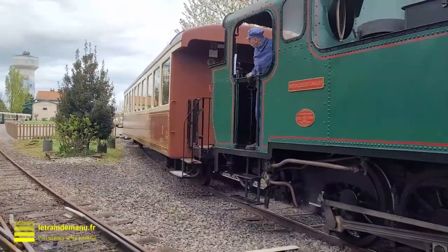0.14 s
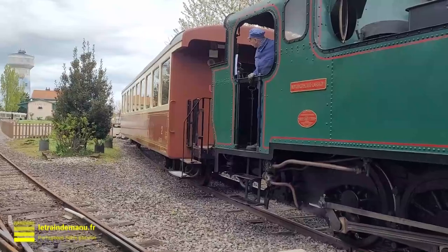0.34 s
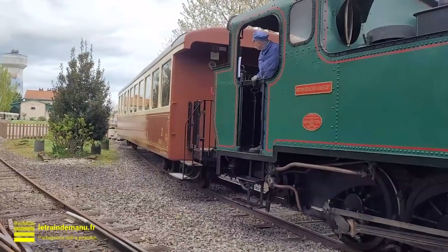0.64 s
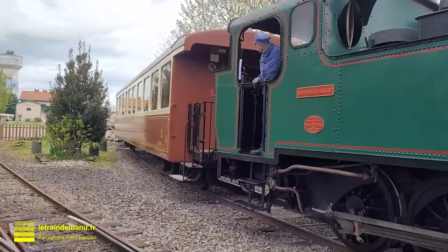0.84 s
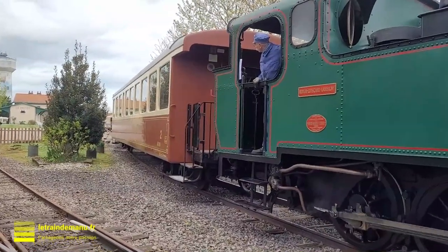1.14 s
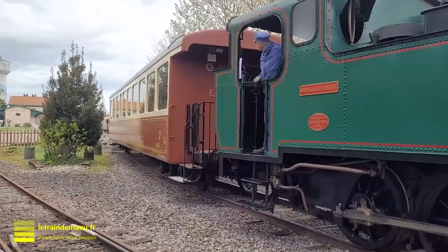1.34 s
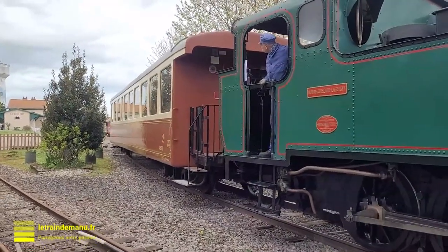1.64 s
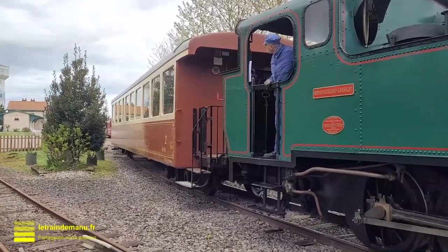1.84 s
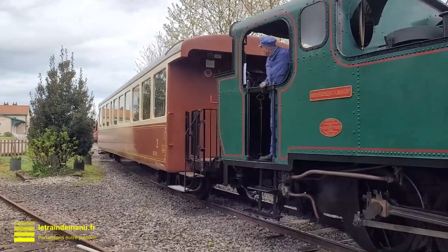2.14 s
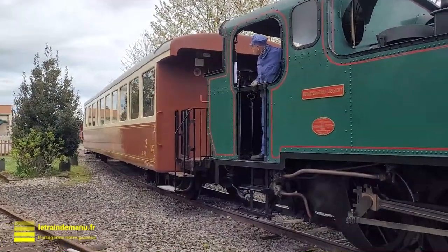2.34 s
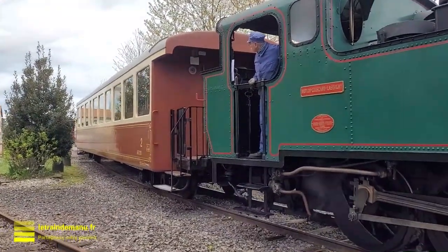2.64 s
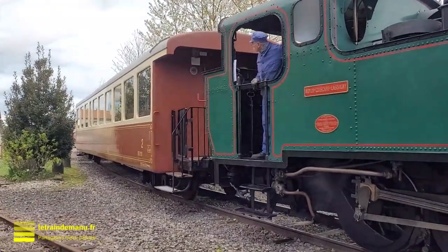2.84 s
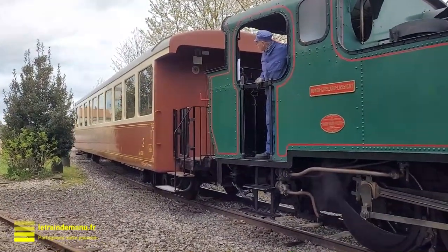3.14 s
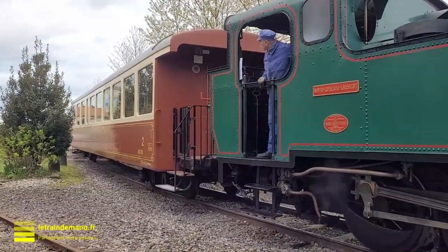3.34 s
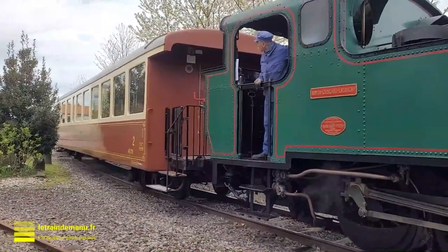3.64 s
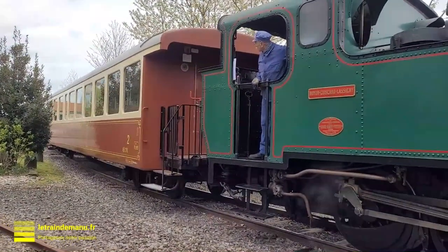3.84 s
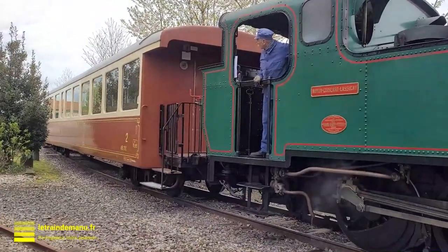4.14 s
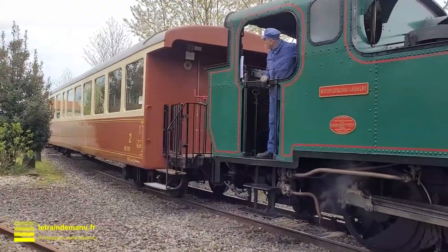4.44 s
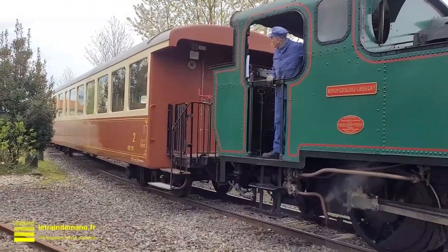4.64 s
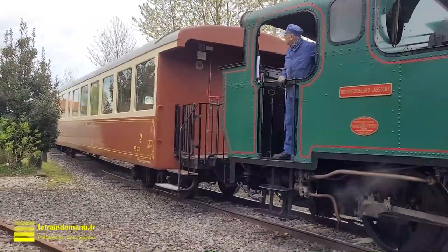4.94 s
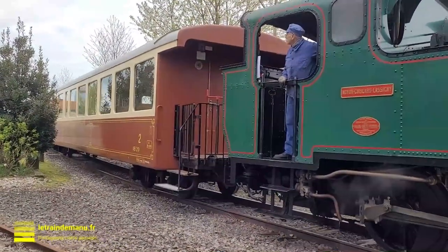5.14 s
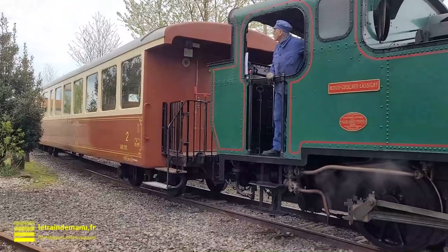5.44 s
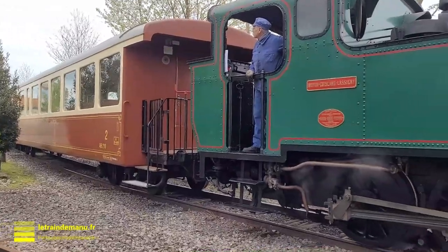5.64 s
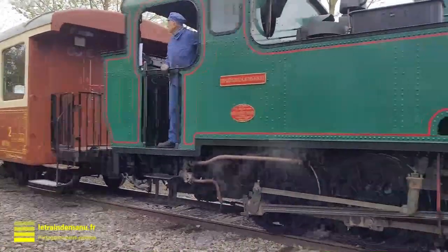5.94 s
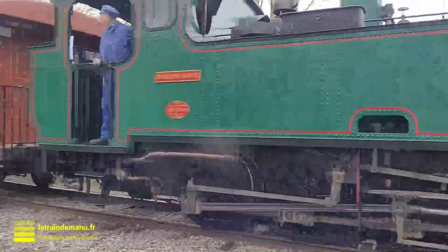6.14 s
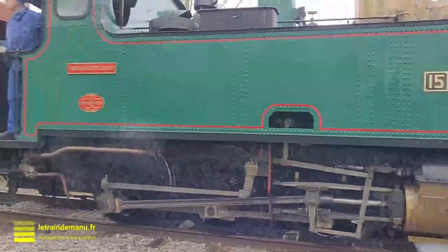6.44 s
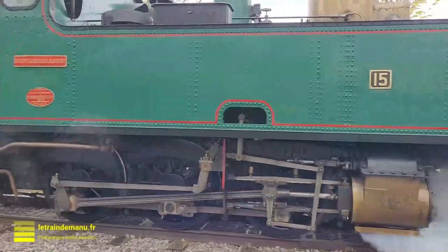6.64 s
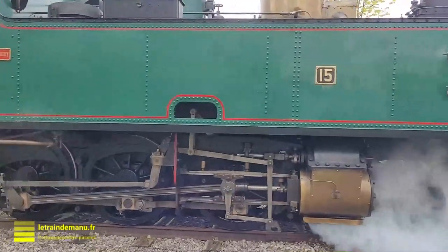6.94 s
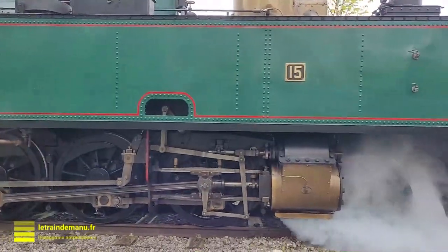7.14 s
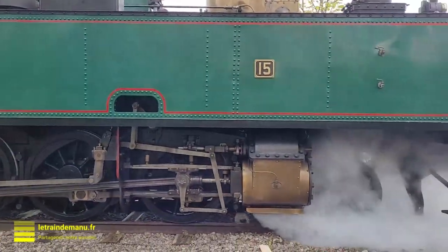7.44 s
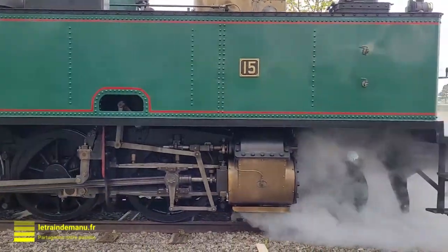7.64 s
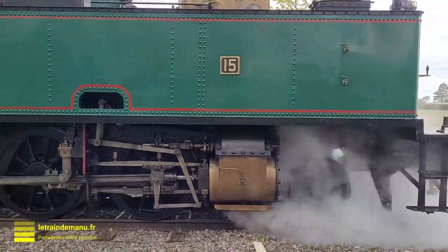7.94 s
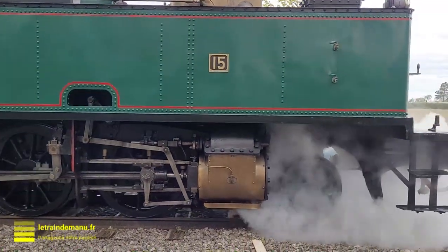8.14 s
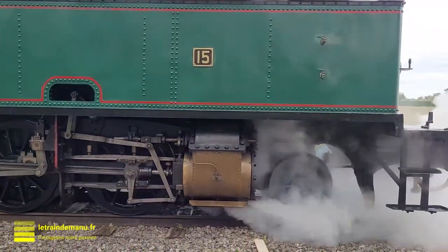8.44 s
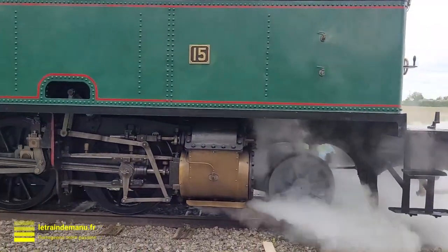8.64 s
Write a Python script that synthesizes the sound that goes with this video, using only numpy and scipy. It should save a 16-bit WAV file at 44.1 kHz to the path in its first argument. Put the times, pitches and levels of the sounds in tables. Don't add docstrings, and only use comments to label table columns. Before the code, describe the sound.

A small steam engine creeps past, brake rod groaning and knocking early on, while rushing drain-cock steam swells, weakens and surges again above deep rumbling.

```python
import sys
import numpy as np
from scipy import signal
from scipy.io import wavfile
from scipy.ndimage import uniform_filter1d

SR = 44100
rng = np.random.default_rng(int(sys.argv[2]) if len(sys.argv) > 2 else 0)


def persist_wave(psi):
    counts = np.round(np.clip(psi, -1, 1) * 32767).astype(np.int16)
    wavfile.write(sys.argv[1], SR, np.atleast_2d(counts).T)


def makeup_ratio(level_db):
    decades = np.asarray(level_db, float) / 20
    return 10 ** decades


N = 387632
LAG_ASIDE = 18.77


def evened(x):
    return x / np.sqrt(np.mean(x ** 2) + 1e-20)


def by_hz(table, hz):
    table_hz, *columns = np.transpose(table)
    return [np.interp(np.log(hz + 1), np.log(table_hz + 1), c)[:, None] for c in columns]


def by_time(table, t):
    s, *columns = np.transpose(table)
    return [np.interp(t, s, c) for c in columns]


def bell(hz, centre_hz, width_hz):
    return np.exp(-.5 * ((hz[:, None] - centre_hz) / width_hz) ** 2)


def bumps(t, at, length, db):
    return (db * np.exp(-.5 * ((t[:, None] - at) / length) ** 2)).sum(1)


def between(t, start, end, ramp_s=0.26):
    return np.clip(np.minimum(t - start, end - t) / ramp_s + .5, 0, 1)


def resonate(x, hz, width):
    turn = np.exp(2j * np.pi * np.cumsum(hz * np.ones(len(x))) / SR)
    r = np.exp(-np.pi * width / SR)
    return 2 * (turn * signal.lfilter([1 - r], [1, -r], x / turn + 1e-18)).real


def times_and_pitches(size):
    return np.arange(4 * N // size + 5) * size / 4 / SR, np.fft.rfftfreq(size, 1 / SR)


# time_s, aim (0 jet aside .. 1 jet ahead)
AIM = [
    (0, 0.066),
    (4.9, 0),
    (5.7, 0.16),
    (6.0, 0.28),
    (6.3, 0.84),
    (6.9, 0.92),
    (8.79, 0.71),
]
# pitch_hz, likeness_aside, likeness_ahead (0..1)
LIKENESS = [(25, 0.65, .6), (70, 0.81, 0.95), (342, 0.66, 0.76), (600, 0.52, 0.75), (1150, 0.79, 0.51),
            (2170, 0.84, 0.25), (2700, 0.44, 0.37), (3900, 0.4, 0.25), (4700, 0.34, 0.41),
            (5200, 0.32, 0.38), (6000, 0.36, .12), (6500, 0.24, 0.14), (7300, .38, .22), (8300, 0.15, 0.15),
            (10800, 0.18, .2), (12400, .08, .12), (14000, .28, .12), (15500, .15, .1)]
# pitch_hz, aside_radians, ahead_radians (left is late)
PHASE_TURN = [(430, -.3, 0), (1300, -.1, 0), (1750, .4, .4), (2150, .3, -.3), (2600, .2, -1),
              (3000, -1, -4), (3900, -2.9, -3.4), (4750, -4.4, -4.4), (5170, -5.7, -5.5), (5600, -6.4, -6),
              (6500, -5.2, -9.6), (7300, -5.2, -9.6), (9500, -4.8, -14.8), (11000, -4.5, -14.6),
              (13500, -5.1, -14), (15000, -4.3, -14.8)]


def noise_pair(t, hz, left_db, right_db, patchy_db, patch_s, patch_hz, flicker_db, flicker_s):
    a, b, c, d, patches = rng.standard_normal((len(t), len(hz), 5)).T
    patches = uniform_filter1d(patches, max(int(patch_hz / hz[1]), 1), 0)
    patches = evened(uniform_filter1d(patches, max(int(patch_s / t[1]), 1), 1))
    flicker = evened(uniform_filter1d(rng.standard_normal(len(t)), max(int(flicker_s / t[1]), 1)))
    aim = by_time(AIM, t)[0]
    aside, ahead = by_hz(LIKENESS, hz)
    same = np.clip(aside + (ahead - aside) * aim, 0, 1)
    turn_aside, turn_ahead = by_hz(PHASE_TURN, hz)
    turn_aside = turn_aside + 2 * np.pi * hz[:, None] * LAG_ASIDE / SR
    facing = np.clip((aim - .1) / .65, 0, 1)
    late = np.exp(-1j * (turn_aside + (turn_ahead - turn_aside) * facing))
    right = a + 1j * b
    left = same * late * right + np.sqrt(1 - same ** 2) * (c + 1j * d)
    swing = makeup_ratio(patchy_db * patches + flicker_db * flicker)
    z = np.array([left * makeup_ratio(left_db), right * makeup_ratio(right_db)]) * swing
    size = 2 * len(hz) - 2
    return signal.istft(z, nperseg=size, noverlap=3 * size // 4)[1][:, :N] / np.sqrt(size)


# start_s, dip_hz, dip_spacing_hz, left_strength, right_strength (0..1)
ECHOES = [
    (0, 1230, 400, .1, 0.18),
    (1.0, 880, 345, 1, 0.057),
    (4.98, 1155, 635, 0.26, 0.38),
    (6.12, 1650, 400, 0.23, 0.83),
    (7.3, 1598, 740, 0.089, 0.69),
]
# (pitch_hz, width_hz, left_db, right_db)
SCREENS = [
    (0, 1.3, [(3560, 430, -4, 1), (4800, 310, 0, -3), (950, 250, 4, 0)]),
    (1.5, 6.22, [(2503, 43, -3, -17), (6600, 450, 8, 1.5), (3370, 56, 4, -9), (13100, 340, -5, 1)]),
    (4.5, 6.13, [(2820, 110, 0, -3), (910, 290, 8.5, 5.5), (2490, 44, -5, 12), (1890, 210, 0.5, -6.5), (2060, 270, 2, 7.5)]),
    (4.5, 7.1, [(5240, 280, 0, 1.5)]),
    (6, 7.22, [(2030, 100, 1, 3), (15000, 770, -0.5, 4), (7000, 460, 2, 0.5)]),
    (6.5, 10, [(828, 52, -21, -2), (2000, 170, 3.5, 2.5), (15400, 400, 5, -9), (8700, 810, -0.5, -1), (13300, 480, -7, -1.5)]),
    (8.42, 9, [(3600, 200, -1.5, -2), (2020, 1100, 2.5, 2), (1740, 100, 0, -5), (2700, 170, -1, -7), (9000, 400, 0, 1)]),
]
# (pitch_hz, width_hz, left_db, right_db)
RIDGES_ASIDE = [
    (1.443, 2.003, [(1910, 76, 3, -1.5), (3020, 470, -1.5, -2), (6000, 490, -5, -1.5), (8000, 200, -7, -1)]),
    (2.4, 3.35, [(2170, 54, -1, -2), (4850, 120, 4, -2), (1560, 140, -0.5, -2)]),
    (3.35, 4.2, [(1550, 190, -1, -2), (2320, 77, 2, 2.5), (5100, 310, 0, 1), (5900, 270, 0.5, -2)]),
    (4.15, 4.6, [(1460, 71, 0.5, 2.5), (1600, 41, 1, -4), (1150, 100, 0, 0.5), (2900, 200, -1, -2.5), (4870, 250, 3, 1)]),
    (4.62, 4.97, [(1030, 250, -10, -5), (2120, 250, -2, -3), (1560, 80, -8, -3)]),
    (1.05, 1.45, [(1700, 300, 2, 2), (2150, 130, 1, 1)]),
    (2.1, 3.35, [(5200, 200, -2, 2.5), (1070, 200, -3.5, -2)]),
    (5.05, 5.702, [(1560, 120, 0, -3), (2120, 69, 2, -1), (4720, 96, 2, 4), (4980, 90, -8, -4), (3200, 190, -1.5, -1.5), (2450, 110, -4, -4), (1270, 64, -2, 1)]),
]
# (pitch_hz, width_hz, left_db, right_db)
RIDGES_AHEAD = [
    (5.7, 6.3, [(1488, 78, -1, 2), (4770, 71, -8, 4), (5260, 114, 0, 6), (9900, 230, 3, 2), (6900, 370, -2.5, -1)]),
    (6.3, 7.4, [(4700, 150, -1, 2), (3100, 170, -1.5, 0.5), (8930, 250, 0, 4.5), (7300, 300, 0, 0.5), (1590, 54, -3, -9)]),
    (7.403, 8.35, [(1430, 35, 3, 5.5), (1640, 90, 1, -4), (2000, 120, -2, -1), (4550, 160, 0, 0.5), (5030, 180, -3, -2)]),
    (8.4, 9, [(1150, 130, -1.5, -3), (2000, 120, -4, -0.5), (2600, 180, 0, 0), (3450, 120, 1.5, 0), (5830, 220, 0, -5), (7000, 540, 0.5, -1.5)]),
]
# start_s, end_s, start_hz, end_hz, level_db
SLIDES = [(5.6, 5.98, 2800, 2400, -7), (6.8, 6.2, 2100, 2660, 1), (6.28, 6.44, 3300, 3200, -14),
          (6.44, 6.6, 3230, 3000, -4), (6.2, 6.9, 2250, 2600, -10), (6, 6.82, 3300, 3040, -6),
          (7.05, 7.3, 2600, 2600, -3), (8.19, 8.6, 2400, 2800, -8), (6.7, 6.97, 3400, 2950, -18),
          (6.93, 6.97, 3060, 3060, -18), (6.6, 7.02, 2700, 2680, -14), (6.3, 7.2, 2200, 2400, -9),
          (7.5, 8.8, 3800, 2700, 5), (8.25, 9.8, 2900, 3200, -8)]


def surroundings(t, hz):
    out = np.zeros((2, len(hz), len(t)))
    ends = [row[0] for row in ECHOES[1:]] + [N]
    for (s, dip_hz, spacing_hz, *strength), end in zip(ECHOES, ends):
        comb = np.exp(-(hz / 2140) ** 2 + 2j * np.pi * (hz - dip_hz) / spacing_hz)
        echo = np.outer(strength, comb)
        out += 20 * np.log10(abs(1 - echo) + 0.033)[..., None] * between(t, s, end)
    for s, end, bands in SCREENS + RIDGES_ASIDE + RIDGES_AHEAD:
        colour_db = sum(np.multiply.outer(db, bell(hz, f, width)) for f, width, *db in bands)
        share = between(t, s, end)
        out[..., share > 0] += colour_db * share[share > 0]
    for s, end, start_hz, end_hz, db in SLIDES:
        path_hz = np.interp(t, [s, end], [start_hz, end_hz])
        out += db * bell(hz, path_hz, 59) * between(t, s, end, ramp_s=0.071)
    return out


# time_s, jet_db
STEAM = [(0.0, -25), (0.41, -33), (0.66, -40.5), (0.9, -57.5), (1.03, -42.5), (1.37, -29), (1.62, -24.5),
         (1.92, -21.5), (2.05, -21.5), (4.02, -24.5), (4.89, -32), (5.36, -22), (5.6, -25), (6.27, -24),
         (7.05, -24), (7.35, -24), (8.2, -28), (8.55, -21)]
# time_s, pipe_db, port_db, fizz_db
BREATHS = [(0, -6.5, -0.5, 3.5), (.5, -1.5, 4, 2.5), (1.35, -4, 3, 3), (1.8, -3, 1, 4), (2.1, 0.5, 0.5, 2),
           (2.6, 4, 1.5, 3.5), (3.5, 4, 3, 4.5), (4.05, 1.5, 3, 4.5), (4.45, 2.5, 1, 4),
           (4.68, -2.5, 3, 5.5), (4.9, -1.5, 3, 6), (5.4, -4, 1.5, 4), (5.8, -1.5, 3, 3),
           (6.15, -2.5, 4.5, 4), (6.45, 1.5, 1, 2.5), (7.3, 2, 1, 2), (7.6, 1, 3, 3), (8.5, 3, 3.5, 3)]
# time_s, length_s, jet_db, ring_db (of pipe and port)
SPITS = [(0.945, .03, -2.5, 0), (1.976, 0.02, -2, -1), (2.1, 0.078, 1.5, 0.5), (4.178, 0.068, -1.5, 0),
         (5.04, 0.022, 1.5, 0), (5.562, 0.014, -2.5, 0.5), (5.874, 0.029, 2, -0.5), (6.136, 0.026, 1, -3),
         (6.241, 0.032, 0, 1.5), (1.7, 0.12, -0.5, 1.5), (6.387, 0.031, -1.5, 2), (6.5, 0.03, 1, 1.5),
         (6.82, 0.024, -3, 0), (6.923, 0.022, 2, -3), (7.045, 0.034, 2, -3), (7.118, 0.019, -1, -1),
         (7.19, .03, -0.5, -0.5), (7.366, 0.069, -3.5, 0), (2.701, 0.037, -1, 1),
         (2.548, 0.045, -0.5, -0.5), (3.33, .04, 0, 0), (3.42, 0.027, 0, -1.5), (3.527, 0.033, -0.5, 0.5),
         (5.465, 0.04, 0.5, -0.5), (1.85, 0.064, -2.5, 0.5), (7.62, .06, -2.5, 0.5),
         (7.837, .05, -0.5, -.5), (8.45, 0.032, -1, -1.5), (8.5, .025, -0.5, 1.5), (6.97, 0.014, 1, -3),
         (5.52, .015, -0.5, -1), (8.79, 0.11, -1.5, -1)]
# pitch_hz, left_aside_db, right_aside_db, left_ahead_db, right_ahead_db
JET_COLOUR = [(664, -12.5, -7, -2.5, -3), (880, -17, -14, -6, -6.5), (1038, -8, -7.5, -5.5, -12),
              (1474, -2.5, -1, -5.5, -3.5), (2000, -1, 2.5, -9, -7), (2690, -7, 0, -6, -8),
              (3130, -7.5, -3, -3.5, -9), (3810, -3, -8.5, -3.5, -4), (4790, -9, -0.5, -3.5, 4),
              (5420, -6.5, -0.5, -5.5, -2.5), (6800, -13, -7, -6.5, -9), (9700, -14, -11.5, -12, -9),
              (12150, -13, -11, -4.5, -5.5), (15300, -10, -9.5, -8, -6)]
# pitch_hz, width_hz, level_db
PORT_DIPS = [
    (8290, 354, -14),
    (9190, 630, -9),
]


def jets():
    t, hz = times_and_pitches(size=1024)
    aim, jet_db = by_time(AIM, t)[0], by_time(STEAM, t)[0]
    pipe_db, port_db, fizz_db = by_time(BREATHS, t)
    at, length, spit_db, ring_db = np.transpose(SPITS)
    spit_db, ring_db = bumps(t, at, length, spit_db), bumps(t, at, length, ring_db)
    jet_db = jet_db + spit_db
    fizz_db = fizz_db + 0.33 * spit_db
    breath_db = jet_db + (pipe_db + ring_db) * bell(hz, 2270, 520)
    breath_db = breath_db + (port_db + ring_db) * bell(hz, 4860, 940)
    breath_db = breath_db + fizz_db * (hz[:, None] > 8400)
    breath_db = breath_db - 60 * np.clip(1 - hz[:, None] / 800, 0, 1) + 13.5
    dips_db = [db * bell(hz, f, width) for f, width, db in PORT_DIPS]
    left_db, right_db = breath_db + surroundings(t, hz) + dips_db
    left_aside, right_aside, left_ahead, right_ahead = by_hz(JET_COLOUR, hz)
    left_db = left_db + left_aside + (left_ahead - left_aside) * aim
    right_db = right_db + right_aside + (right_ahead - right_aside) * aim
    return noise_pair(t, hz, left_db, right_db, patchy_db=1.09, patch_s=0.08, patch_hz=250,
                      flicker_db=0.35, flicker_s=.03)


# time_s, level_db
LOAD = [
    (0, -41),
    (.6, -50),
    (1.1, -46),
    (1.7, -39.5),
    (2.1, -46),
    (2.8, -54),
    (3.7, -54),
    (4.9, -49),
    (5.5, -45),
    (8.79, -49),
]
# time_s, length_s, level_db (over the load)
JOLTS = [(0.05, 0.044, -9), (1.03, .02, 4), (3.13, 0.21, 11), (3.51, 0.026, 8.5), (4.247, 0.029, 7.5),
         (4.59, 0.029, 7.5), (6.287, 0.018, -3), (8.13, 0.037, -4), (5.056, 0.049, 5), (5.432, 0.043, 1.5),
         (6.05, 0.11, 3.5), (6.355, 0.077, -2.5), (6.804, .05, 1), (6.93, .03, 4.5), (7.048, 0.019, 2),
         (7.222, 0.015, 5), (7.451, 0.11, 3), (8.257, 0.029, 6), (8.444, 0.073, 4)]
# pitch_hz, aside_db, ahead_db
LOW_COLOUR = [(20, -10, -21), (35, -14, -9), (60.6, 4, -0.5), (112, -2, 0), (131, -2, 0.5),
              (193, -7.5, -4.5), (238, -3.5, -1), (319, -11, -7.5), (400, -6.5, -22.5), (450, -9, -10),
              (547, -17, -8.5), (633, -7.5, -4.5), (820, -9, -15.5), (920, -3, -51)]
# start_s, end_s, pitch_hz, width_hz, level_db
HOLLOWS = [(-1, 1.46, 570, 76, 3.5), (-2, 1, 1080, 130, 8), (4, 1.2, 520, 64, 5), (1.5, 1.6, 500, 35, -7),
           (3, 4.2, 525, 43, -7), (-0.2, 1.67, 294, 53, 5.5), (2.5, 2.92, 216, 47, -8.5),
           (4, 6, 550, 38, 5), (8, 8.9, 430, 79, -5), (1.5, 3.4, 310, 46, -5), (6.5, 6, 410, 46, -3.5),
           (6, 2.9, 250, 40, -3)]
# pitch_hz, level_db (per Hz)
YARD_WASH = [(410, -30), (700, -11), (1380, 2), (2110, -11), (2530, -14), (3550, -8), (4200, -6),
             (5170, -24), (8700, -42), (12000, -28), (15600, -24)]


def rumble():
    t, hz = times_and_pitches(size=2048)
    hz_part = hz[:, None]
    aim, load_db, jet_db = by_time(AIM, t)[0], by_time(LOAD, t)[0], by_time(STEAM, t)[0]
    wander, wander_s = 0.038, 0.13
    drift = evened(uniform_filter1d(rng.standard_normal(len(t)), max(int(wander_s / t[1]), 1)))
    aside, ahead = (column[:, 0] for column in by_hz(LOW_COLOUR, hz_part * (1 + wander * drift)))
    jolt_db = bumps(t, *np.transpose(JOLTS))
    extra_load_db, extra_jet_db = load_db - load_db.mean(), jet_db - jet_db.mean()
    body_db = -44.5 + 0.62 * extra_load_db + 0.76 * jolt_db - 0.5 * aim
    roar_db = -46 + 0.42 * extra_jet_db + 0.29 * extra_load_db + 1.5 * aim
    upper_db = np.where(hz_part < 400, body_db, roar_db)
    level_db = np.where(hz_part < 95, load_db + jolt_db, upper_db) + 30.5
    db = level_db + aside + (ahead - aside) * aim - 0.039 * np.maximum(hz_part - 850, 0)
    db = db + sum(dip_db * bell(hz, f, width) * between(t, s, end) for s, end, f, width, dip_db in HOLLOWS)
    db = np.maximum(db, by_hz(YARD_WASH, hz)[0] - 54.5 + 21.5)
    return noise_pair(t, hz, db - 2.0, db, patchy_db=2, patch_s=.1, patch_hz=80,
                      flicker_db=1.27, flicker_s=.06)


# start_s, length_s, level_db
GROANS = [(0.036, .07, -42), (0.328, 0.065, -33.5), (0.637, 0.22, -35), (0.803, 0.33, -27),
          (1.124, 0.16, -31.5), (1.241, 0.054, -35), (1.31, 0.21, -28), (1.493, 0.42, -28.5),
          (1.905, 0.17, -37), (2.067, 0.11, -40), (4.454, 0.041, -55), (4.56, 0.14, -35.5),
          (4.718, .1, -39.5), (5.007, 0.18, -37), (5.214, 0.088, -36), (5.802, 0.13, -38),
          (5.937, 0.066, -29.5), (6.047, 0.1, -35.5), (6.203, 0.081, -38), (8.05, 0.12, -37.5),
          (8.206, 0.076, -34.5), (8.345, .12, -43), (8.583, 0.11, -39)]


def groan():
    tugs = (rng.random(N) < 110 / SR) * rng.uniform(0.62, 1, N)
    level, hz = np.zeros(N), np.full(N, 126.6)
    for s, length, db in GROANS:
        u, first = np.linspace(0, 1, round(length * SR)), round(s * SR)
        level[first:][:len(u)] += makeup_ratio(db - 8.5 * u) * signal.windows.tukey(len(u), 0.26)
        hz[first:][:len(u)] -= 2.5 * u
    tone = resonate(resonate(tugs, hz, 9.4), hz, 52)
    return level * tone / np.sqrt(uniform_filter1d(tone ** 2, 2000) + 1e-14)


def ring(modes, detune, onset_s):
    t = np.arange(SR // 8) / SR
    tones = 0
    for (hz, db, t60), d in zip(modes, detune):
        tones = tones + makeup_ratio(db - 60 * t / t60) * np.sin(2 * np.pi * hz * d * t)
    return tones * (1 - np.exp(-t / onset_s))


# time_s, peak_db, hollow_db
SLIPS = [(0.052, -23.5, -14), (0.151, -27, -7), (0.26, -29.5, -5), (0.352, -28, -11), (0.416, -26, -11),
         (0.509, -30, -8), (0.573, -34, -16), (0.65, -26, -6), (0.672, -27, -6), (0.727, -28, -11),
         (0.748, -22.5, -5), (0.786, -21.5, -9), (0.807, -24, -3.5), (0.838, -23, -10), (0.853, -30, -3),
         (0.868, -25, -12), (0.888, -24, -10), (0.903, -26, -14), (.935, -36, -3), (0.963, -35, -7),
         (.98, -39, -2), (1.001, -26, -12), (1.013, -26, -14), (1.04, -26, -9), (1.057, -30, -5),
         (1.112, -25.5, -17), (1.191, -26, -20), (1.234, -25.5, -11), (1.262, -27, -8), (1.337, -27, -17),
         (1.437, -32, -15), (1.554, -30, -9), (1.653, -30, -17), (1.701, -38.5, 7), (1.772, -34, -4),
         (8.582, -27.5, -20)]
# pitch_hz, level_db, t60_s
ROD = [
    (248, 0, 0.14),
    (295, -1, 0.12),
    (180, 4, 0.027),
]
# pitch_hz, level_db, t60_s
ROD_HOLLOW = [
    (513, 1.5, 0.063),
    (613, 5, 0.037),
    (826, 2.5, 0.017),
]


def slips():
    out = np.zeros(N + SR)
    detune = 1 + 0.046 * rng.standard_normal((len(SLIPS), 2, 3))
    for (s, db, hollow_db), (low, high) in zip(SLIPS, detune):
        knock = 0.88 * ring(ROD, low, onset_s=.002)
        knock = knock + makeup_ratio(hollow_db) * ring(ROD_HOLLOW, high, onset_s=0.0011)
        out[round(s * SR):][:len(knock)] += makeup_ratio(db) * knock
    return out[:N]


# start_s, length_s, start_hz, end_hz, level_db
NARROW = [
    (4.19, .04, 15450, 15550, -39),
    (4.22, .05, 15650, 15600, -33),
    (4.262, .1, 15300, 14980, -36),
    (5.28, 0.13, 4750, 4800, -34),
    (5.43, .1, 4780, 4760, -35),
    (5.29, .12, 4470, 4520, -37),
    (5.45, .07, 2210, 2100, -30),
    (5.32, .08, 2160, 2120, -35),
]
# start_s, length_s, start_hz, end_hz, level_db
BREATHY = [
    (5.11, 0.136, 6850, 6900, -35),
    (5.24, 0.084, 6800, 6940, -39),
    (5.33, 0.077, 6740, 6760, -41),
    (5.42, .09, 6850, 6850, -39),
]
# start_s, length_s, start_hz, end_hz, level_db
SNAPS = [
    (5.8815, .003, 4800, 4700, -19),
    (5.8958, .002, 5100, 5100, -22),
    (5.899, .002, 5400, 5300, -15),
    (5.9095, .0025, 5100, 4900, -17),
]


def whistles():
    out = np.zeros(N)
    for rows, width_hz in (NARROW, 70), (BREATHY, 220), (SNAPS, 900):
        for s, length, start_hz, end_hz, db in rows:
            n = round(length * SR)
            hz = np.linspace(start_hz, end_hz, n)
            noise = rng.standard_normal(SR // 4)[:n]
            tone = resonate(resonate(noise, hz, width_hz), hz, width_hz)
            out[round(s * SR):][:n] += makeup_ratio(db) * evened(tone) * signal.windows.tukey(n, .5)
    return out


def scene():
    compact = slips() + groan()
    late = np.roll(compact, round(LAG_ASIDE))
    rod_pair = np.array([makeup_ratio(-3.0) * late, makeup_ratio(-1.5) * compact])
    return jets() + rumble() + rod_pair + makeup_ratio([[-1.2], [1.2]]) * whistles()


def masked(x, below_db, notch_db, lead=813):
    shape = dict(nperseg=2048, noverlap=1024, window="cosine")
    hz, t, z = signal.stft(np.pad(x, ((0, 0), (lead, 0))), SR, **shape)
    wide = np.exp(-.5 * ((np.log(hz[:, None] + 400) - np.log(hz + 400)) / .25) ** 2)
    power = abs(z) ** 2
    near = uniform_filter1d(power, size=4, axis=1)
    around = (wide / wide.sum(1)[:, None]) @ power
    limit_db = below_db + 1 * (hz[:, None] < 1500) - notch_db * bell(hz, 8400, 850)
    kept = z * (near > around * makeup_ratio(-2 * limit_db))
    return signal.istft(kept, **shape, fs=SR)[1][:, lead:lead + N]


def roll_off(x):
    return signal.sosfilt(signal.butter(12, 15900, fs=SR, output="sos"), x)


def record(dry):
    edge = signal.firwin(1023, 15850, window=("kaiser", 8), fs=SR)
    limited = signal.oaconvolve(dry, edge[None], "same")
    return roll_off(masked(limited, below_db=7.6, notch_db=2.8))


dry = scene()
out = record(dry)
persist_wave(out)
```